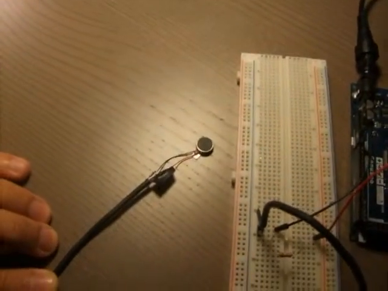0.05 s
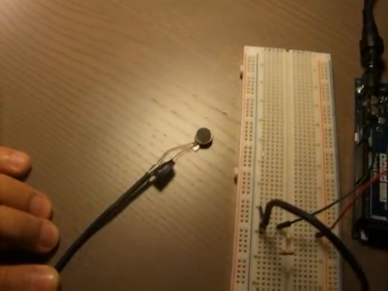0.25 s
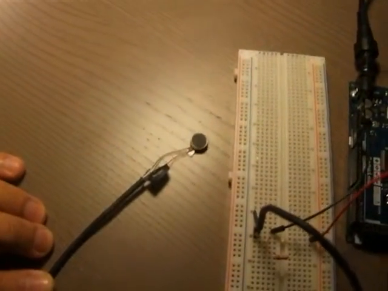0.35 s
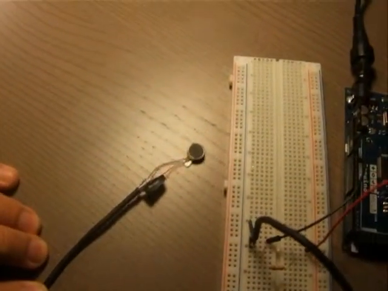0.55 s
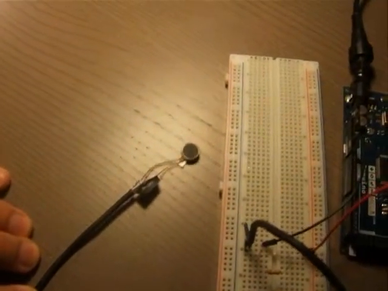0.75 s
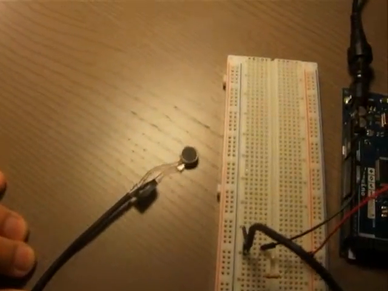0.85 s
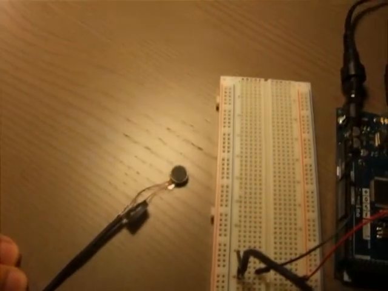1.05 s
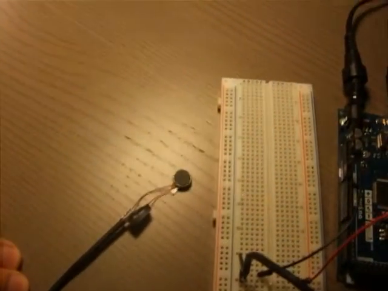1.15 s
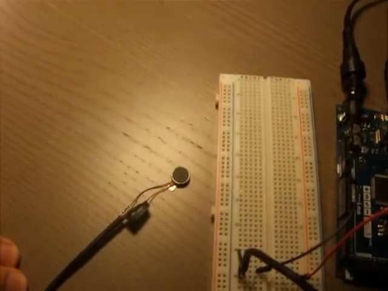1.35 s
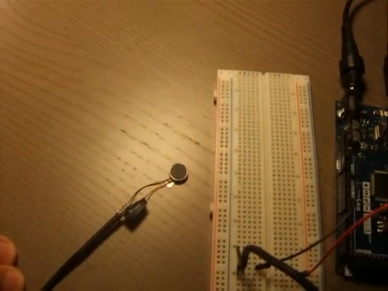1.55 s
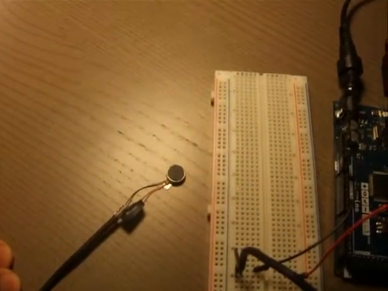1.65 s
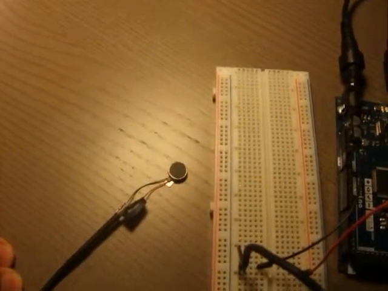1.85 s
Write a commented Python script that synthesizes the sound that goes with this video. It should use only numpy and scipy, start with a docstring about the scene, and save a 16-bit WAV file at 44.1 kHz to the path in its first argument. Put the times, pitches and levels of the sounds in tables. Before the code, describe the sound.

Rapid, irregular rattling buzz of a tiny motor hopping on wood, then two faint clicks.

```python
"""Vibration motor loose on a table

A coin motor buzzes for about a second on a wooden table, speeding up. It taps and scuffs on every turn,
and every six turns or so it hops and lands with a sharp knock. Each contact rings the metal case and
the table top and echoes off things nearby. Two small clicks follow, over a quiet bed of hum and hiss."""
import sys
import numpy as np
from scipy import signal
from scipy.fft import rfft, irfft
from scipy.io import wavfile
from scipy.ndimage import uniform_filter1d

SR = 44100
rng = np.random.default_rng(int(sys.argv[2]) if len(sys.argv) > 2 else 0)


def put_to_file(sound):
    """Save the sound as 16-bit audio at rate SR, in the file named by the first command-line argument."""
    columns = np.atleast_2d(sound).T  # one column per channel
    safe = np.clip(columns, -1, 1)
    whole_steps = np.round(safe * 32767)
    wavfile.write(sys.argv[1], SR, whole_steps.astype(np.int16))


N = 83790


def undb(db):
    """Decibels to gain."""
    return 10 ** (np.asarray(db) / 20)


def unit(x):
    """Scale to rms 1."""
    return x / np.sqrt(np.mean(x ** 2))


def curve(rows):
    """Join (seconds, value) rows by straight lines, holding both ends."""
    return np.interp(np.arange(N) / SR, *np.array(rows).T)


def drift(spread, rate_hz):
    """Glide between random values, rate_hz of them a second."""
    steps = spread * rng.standard_normal(1000)
    return np.interp(np.arange(N) / SR * rate_hz, np.arange(len(steps)), steps)


def add(out, at, x):
    """Mix x in from a time in seconds."""
    i = int(np.clip(at * SR, 0, N - 1))
    out[i:i + len(x)] += x[:N - i]


def conv(x, response):
    """Pass a sound through an impulse response."""
    return signal.fftconvolve(x, response)[:N]


def colour(x, points, size=4096):
    """Minimum-phase EQ through (Hz, dB) points."""
    hz, db = np.array(points).T
    freqs = np.maximum(np.arange(size // 2 + 1) * SR / size, 1)
    gain = undb(np.interp(np.log(freqs), np.log(hz), db))
    cepstrum = irfft(np.log(gain))
    cepstrum[1:size // 2] *= 2
    cepstrum[size // 2 + 1:] = 0
    return conv(x, irfft(np.exp(rfft(cepstrum))))


def fade(t60, size=N):
    """Exponential decay, 60 dB down after t60 seconds."""
    return np.exp(-np.log(1000) * np.arange(size) / SR / t60)


def ring(hz, t60):
    """One dying mode."""
    return np.cos(2 * np.pi * hz * np.arange(N) / SR) * fade(t60)


def resonances(modes):
    """Ringing modes, each with the given gain at its peak."""
    return sum(undb(db) * 2 * np.log(1000) / (t60 * SR) * ring(hz, t60) for hz, db, t60 in modes)


def burst(t60):
    """Dying noise of unit energy."""
    x = rng.standard_normal(N) * fade(t60)
    return x / np.linalg.norm(x)


def even_noise(envelope):
    """Noise of unit energy under an envelope, its spectrum ironed nearly flat."""
    x = rng.standard_normal(len(envelope)) * envelope
    for _ in range(5):
        white = irfft(np.exp(1j * np.angle(rfft(x))), len(x))
        power = np.abs(uniform_filter1d(white ** 2, size=32))
        x = envelope * white / np.sqrt(power + 1e-18)
    return x / np.linalg.norm(x)


# Mains hum. Each row: pitch in Hz, rms level in dB.
MAINS_TONES = [(120, -60), (240, -66), (282, -76.5), (322, -69.5)]
# Tone of the hiss. Each row: frequency in Hz, relative level in dB.
HISS_EQ = [(25, -5.5), (60, -15.5), (110, -12), (170, -15.5), (310, -10.5), (420, -13.5), (780, -16.5),
           (1250, -17.5), (3000, -20), (5800, -19.5), (7000, -21), (8000, -66)]

def background():
    """A steady, even background hiss with a low electrical hum."""
    t = np.arange(N) / SR
    hum = sum(undb(db) * np.sin(2 * np.pi * (hz * t + rng.random())) for hz, db in MAINS_TONES)
    hiss = unit(colour(rng.standard_normal(N), HISS_EQ))
    return np.sqrt(2) * hum + undb(-50.5) * hiss


# The motor's rev. Each row: time in seconds, speed in turns per second.
ROTOR_SPEED = [(.21, 103), (.27, 113.5), (.376, 130.4), (.43, 133), (.598, 137), (.722, 155), (.9, 162.5),
               (1.046, 174.3), (1.152, 187), (1.22, 168), (1.3, 200)]
# How hard it shakes. Each row: time in seconds, level in dB.
SHAKE_LEVEL = [(.205, -27), (.22, -8.5), (.26, 0.5), (.33, -1.5), (.6, -0.5), (.9, -1.5), (1.18, -3.5),
               (1.225, -10), (1.26, -26), (1.30, -60)]

def rotor():
    """The weight spins up with a slight wobble: turns made so far, and strength of the shake."""
    speed = curve(ROTOR_SPEED) * (1 + drift(0.017, rate_hz=39.91))
    return np.cumsum(speed) / SR, undb(curve(SHAKE_LEVEL))


# The motor's low drone. Each row: harmonic number, level in dB at 150 turns per second and
# a shake of 0 dB, rise in dB per octave of speed.
ROTOR_HARMONICS = [(1, -60.5, 22), (2, -53, 11), (3, -63.5, 13)]

def rotor_hum(turns, shake):
    """The off-centre weight rocks the table unevenly, harder as it speeds up."""
    octaves = np.log2(curve(ROTOR_SPEED) / 150)
    hum = np.zeros(N)
    for harmonic, db, rise in ROTOR_HARMONICS:
        level_db = db + rise * octaves + drift(2.55, rate_hz=25.07)
        hum += undb(level_db) * np.sin(2 * np.pi * harmonic * turns)
    return shake * np.sqrt(2) * hum


def scuffing(turns, shake):
    """The case rubs the wood once a turn: noise that jumps up and sags."""
    rub = np.exp(-(turns % 1) / 0.9) * rng.standard_normal(N)
    return undb(-36.5) * shake * unit(rub)


def contact(size=2048, attack_s=0.00058):
    """A very short scraping blow that trails off in fine chatter."""
    attack = 1 - np.exp(-np.arange(size) / SR / attack_s)
    decay = fade(0.011, size) + undb(-20) * fade(0.04, size)
    return even_noise(attack * decay)


def taps(turns, shake, jitter_turns=0.16, swing_db=5):
    """One loose tap on each turn, uneven in time and strength."""
    force = np.zeros(N)
    chance = rng.standard_normal((int(turns[-1]), 2))
    for turn, (late, strength) in enumerate(chance):
        i = min(np.searchsorted(turns, turn + jitter_turns * late), N - 1)
        gain = shake[i] * undb(-18.5 + swing_db * np.tanh(strength / 2))
        add(force, i / SR, gain * contact())
    return force


# Tone of the light chatter against that of a landing. Each row: frequency in Hz, gain in dB.
CHATTER_EQ = [(150, 1), (500, 3.5), (950, 11.5), (1600, -1), (2300, 7), (3200, 1), (4700, -4.5), (6200, -7),
              (7500, -8.5)]

def chatter(turns, shake):
    """Scuffs and taps merge into one buzzing force, duller than a landing."""
    return colour(scuffing(turns, shake) + taps(turns, shake), CHATTER_EQ)


# Tone of the case's click. Each row: frequency in Hz, gain in dB.
CASE_EQ = [(60, -48.5), (200, -27.5), (600, -31), (1400, -18.5), (2100, -14.5), (2700, -0.5), (3450, -4.5),
           (4300, 3.5), (4800, -1), (5200, 0), (6000, 2.5), (6600, -2.5), (7500, -12)]
# Its metallic ring. Each row: pitch in Hz, peak gain in dB, seconds to fall 60 dB.
CASE_RING = [(2347, -7, 0.026), (2720, 3, 0.039), (2974, 7, 0.04), (3260, 1, 0.064), (3690, 9, 0.017),
             (3890, -3, 0.038), (4060, 0, .036), (4550, 3.5, .035), (4739, 7, 0.025), (5067, 5.5, 0.032),
             (5230, 2.5, .045), (5705, -1.5, 0.046), (6230, 5, 0.023), (6730, 9.5, 0.023)]
# Early reflections from things nearby. Each row: delay in milliseconds, gain in dB.
NEAR_ECHOES = [(1.26, -8), (5.85, -9), (7.7, -17), (21.2, -31)]
# Bright slaps off small hard surfaces. Each row: delay in seconds, gain in dB before their EQ.
SLAPS = [(0.0163, 3.5), (0.0275, -3.5)]
# Their tone, all treble. Each row: frequency in Hz, gain in dB.
SLAP_EQ = [(500, -41.5), (3000, -43.5), (4700, -16), (5800, -6.5), (6400, -7.5), (7500, -20)]

def metal_case(force):
    """The case clicks and rings at once; things nearby throw the sound back."""
    impulse = signal.unit_impulse(N)
    arrivals = impulse.copy()
    for ms, db in NEAR_ECHOES:
        arrivals[int(ms * SR / 1000)] += undb(db)
    response = colour(arrivals, CASE_EQ) + conv(arrivals, resonances(CASE_RING))
    slap = colour(impulse, SLAP_EQ)
    for delay, db in SLAPS:
        add(response, delay, undb(db) * slap)
    return conv(force, response)


# The table's woody body. Each row: pitch in Hz, relative peak gain in dB, seconds to fall 60 dB.
TABLE_MODES = [(302, -9.5, 0.027), (516, -7, 0.027), (805.5, 1, 0.045), (955, -6.5, 0.04), (1106, 3, 0.022),
               (1274, -0.5, 0.029), (1620, 4.5, 0.02), (1754, -2, 0.035)]

def table_top(force, lag_s=0.0032):
    """The wood answers with a hollow thud: a weak front, then the main wave."""
    thud = undb(1) * conv(force, resonances(TABLE_MODES))
    out = undb(-8) * thud
    add(out, lag_s, thud)
    return out


# Tone of the room's tail. Each row: frequency in Hz, relative gain in dB.
ROOM_EQ = [(150, -4), (300, -3), (600, -1.5), (950, 2), (1600, -3), (2300, 3), (3200, -5.5), (4300, 5),
           (4800, -7), (5800, 2), (7300, -9)]
ROOM_T60_S = 0.3

def room_tail():
    """The room's response: a short, diffuse wash of reflections."""
    return undb(-8.5) * colour(even_noise(fade(ROOM_T60_S)), ROOM_EQ)


# The hard knocks. Each row: start in seconds, relative strength in dB, extra thud in the wood in dB.
LANDINGS = [(0.212, -10, 5), (0.2209, -12, 4.5), (.2530, -2.5, -1), (.2607, 0.5, 2.5), (0.3026, 3, 1),
            (.3370, 5, 1), (0.3763, 3, 2.5), (0.4098, 4.5, 2), (0.4477, 2.5, 0), (.4860, -2, 2.5),
            (.5325, -1, 1), (0.5766, 5.5, -3.5), (.6160, 0, 4), (0.6205, 2, 1), (0.6691, 5, -1.5),
            (0.7218, 4, 1.5), (0.767, 4.5, -1), (0.8119, 4, 0.5), (0.845, 1, 3.5), (0.8885, 5.5, -1.5),
            (0.93, -1, 1), (0.9327, 0, 3), (0.9799, 4.5, -0.5), (1.0339, 5, 1), (1.0629, 2.5, 3.5),
            (1.1073, 4.5, 1), (1.152, 3, 1.5), (1.2027, -3, -3), (1.2053, -0.5, 3.5), (1.246, -4, 4)]

def landings():
    """Each hop ends in a hard contact: the force on the case and the force on the wood."""
    on_case, on_wood = np.zeros(N), np.zeros(N)
    for at, db, thud_db in LANDINGS:
        blow = undb(db - 2) * contact()
        add(on_case, at, blow)
        add(on_wood, at, undb(thud_db) * blow)
    return on_case, on_wood


# Things being handled. Each row: start in seconds, crack level in dB before its EQ,
# ring pitch in Hz, ring level in dB, seconds for the ring to fall 60 dB.
HANDLING_CLICKS = [(1.7751, -17.5, 626, -32, 0.023), (1.8712, -18.5, 3600, -41.5, 0.032)]
# Tone of the crack. Each row: frequency in Hz, gain in dB.
CRACK_EQ = [(200, -32), (800, 8), (1800, -6), (3200, 7), (5500, 8), (7500, 9)]

def clicks():
    """A woody tock and a thin tick, each a crack with one short ring and a touch of room."""
    out = np.zeros(N)
    for at, crack_db, hz, ring_db, t60 in HANDLING_CLICKS:
        crack = colour(burst(t60=0.013), CRACK_EQ)
        add(out, at, undb(crack_db) * crack + undb(ring_db) * ring(hz, t60))
    return out + undb(-16) * conv(out, burst(ROOM_T60_S))


def scene():
    """Steady hiss and hum, the motor on the table and the late clicks, in mono."""
    tail = room_tail()
    turns, shake = rotor()
    out = background() + clicks() + rotor_hum(turns, shake)
    on_case, on_wood = landings()
    buzz = chatter(turns, shake)
    rattle = metal_case(on_case + buzz) + table_top(on_wood + buzz)
    add(out, 0.008, conv(rattle, tail))  # reverb with 8 ms of pre-delay
    return (out + rattle)[None]


def record(dry, roll_off_hz=6500, cut_hz=7300):
    """A narrow-band microphone: the top rolls off and is then cut."""
    soft = signal.sosfilt(signal.butter(12, roll_off_hz, fs=SR, output="sos"), dry)
    return signal.sosfilt(signal.ellip(8, .2, 70, cut_hz, fs=SR, output="sos"), soft)


dry = scene()
out = record(dry)
put_to_file(out)
```